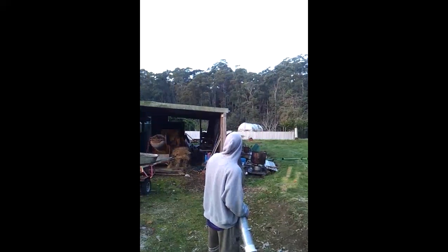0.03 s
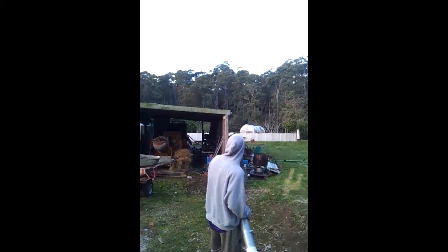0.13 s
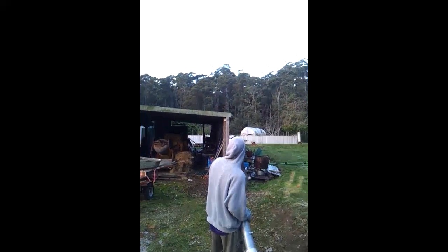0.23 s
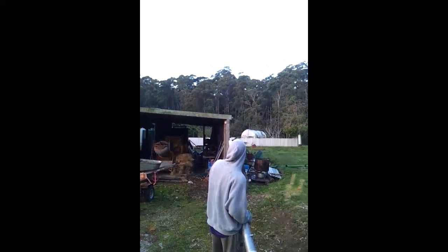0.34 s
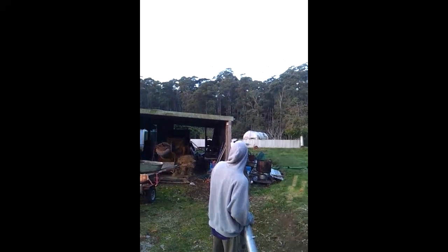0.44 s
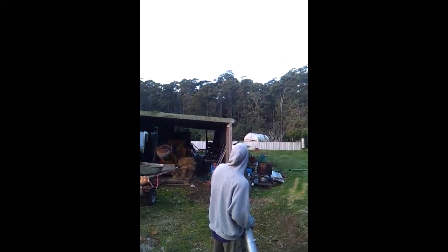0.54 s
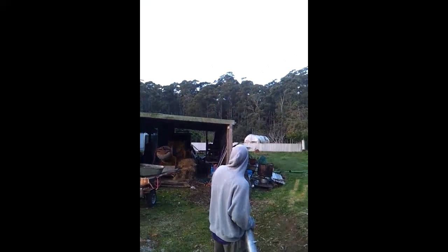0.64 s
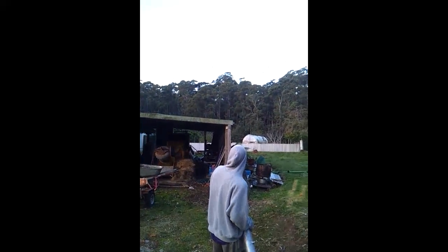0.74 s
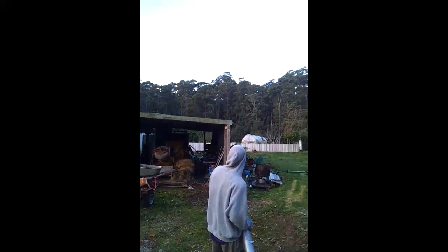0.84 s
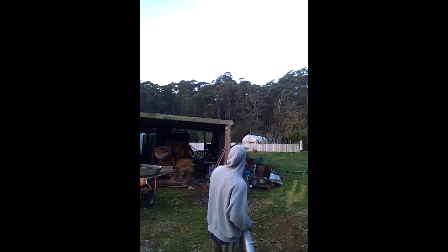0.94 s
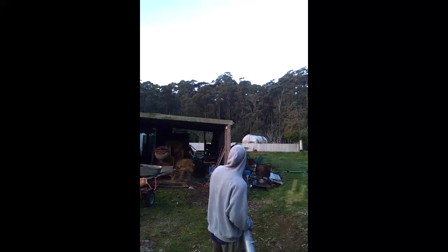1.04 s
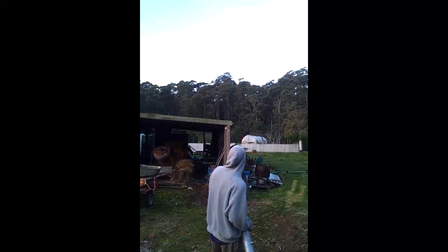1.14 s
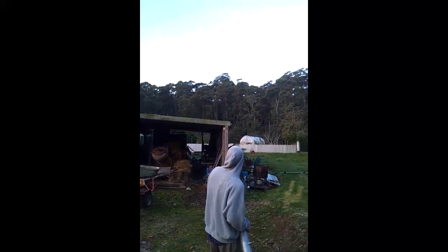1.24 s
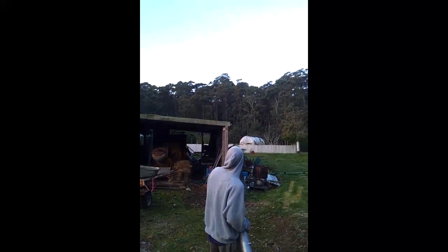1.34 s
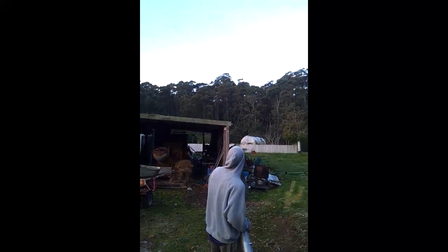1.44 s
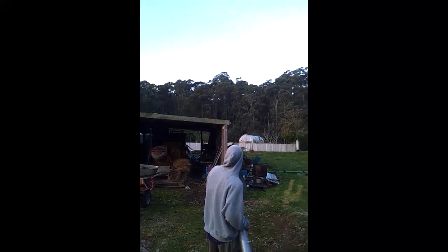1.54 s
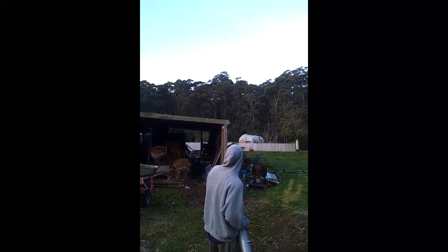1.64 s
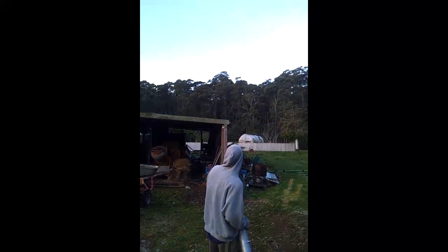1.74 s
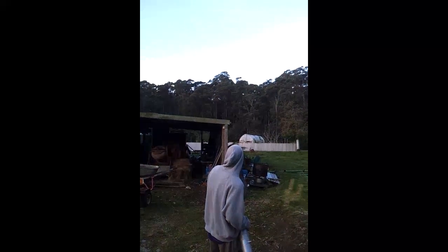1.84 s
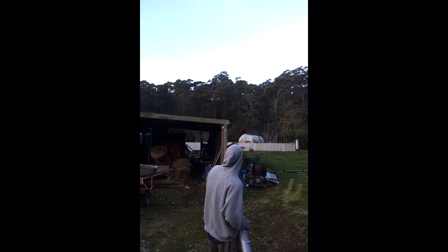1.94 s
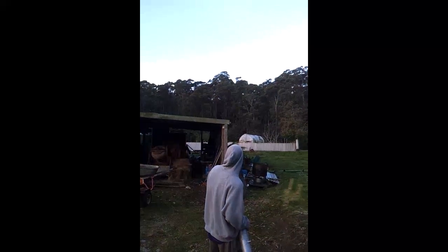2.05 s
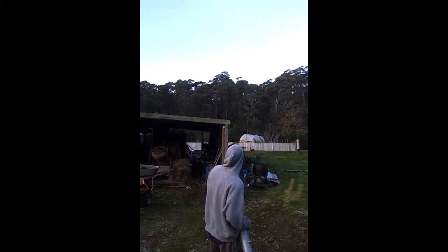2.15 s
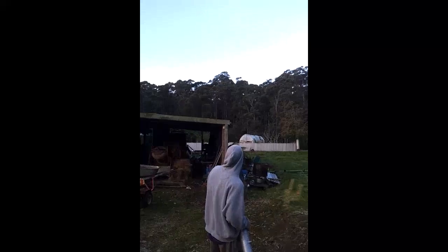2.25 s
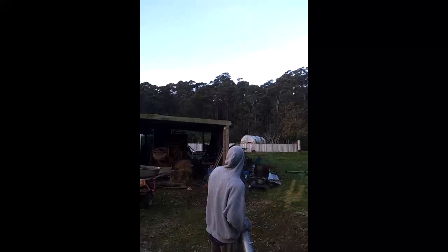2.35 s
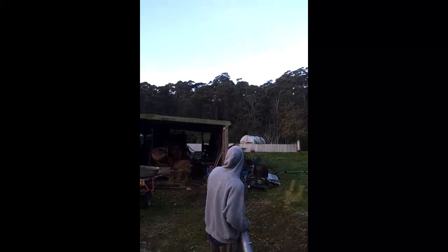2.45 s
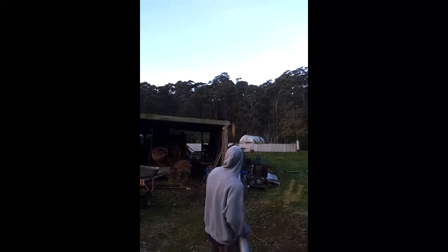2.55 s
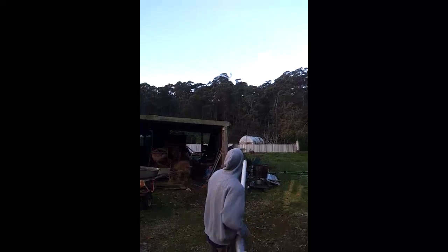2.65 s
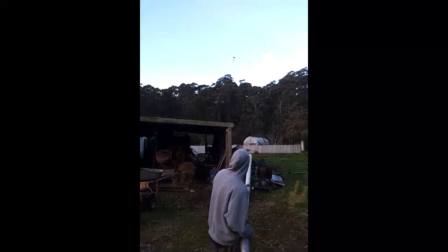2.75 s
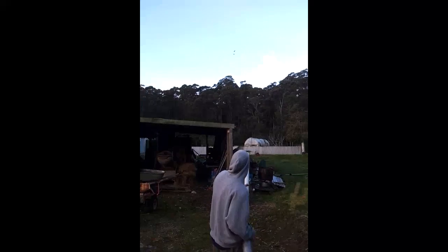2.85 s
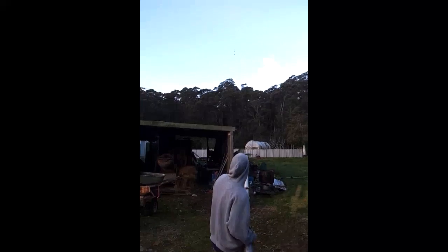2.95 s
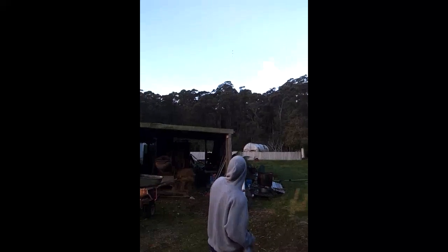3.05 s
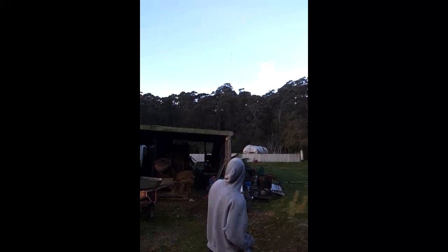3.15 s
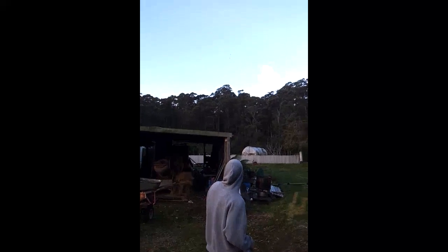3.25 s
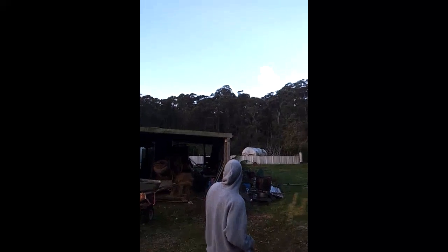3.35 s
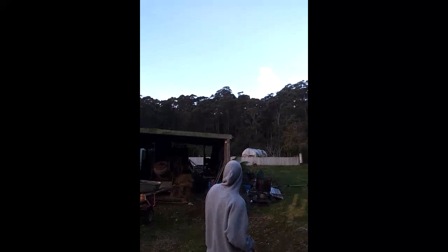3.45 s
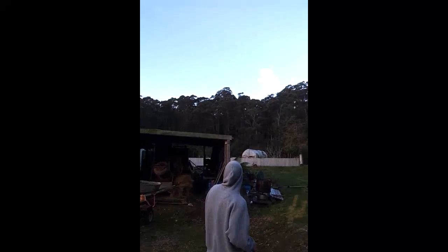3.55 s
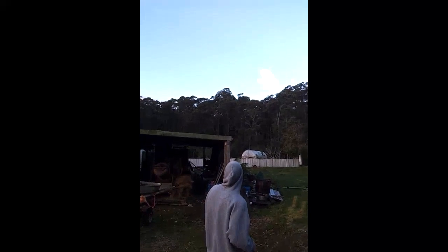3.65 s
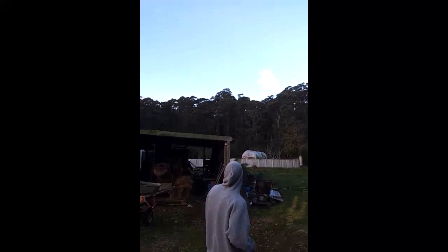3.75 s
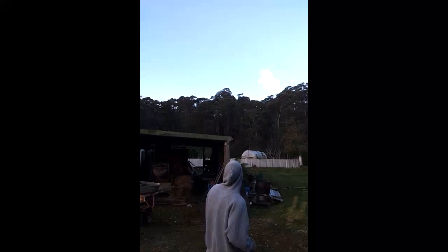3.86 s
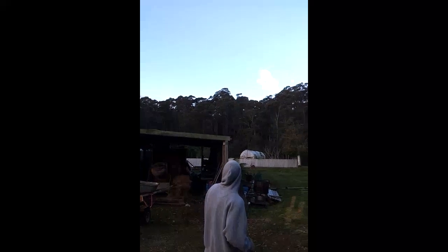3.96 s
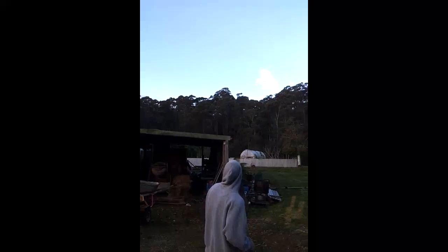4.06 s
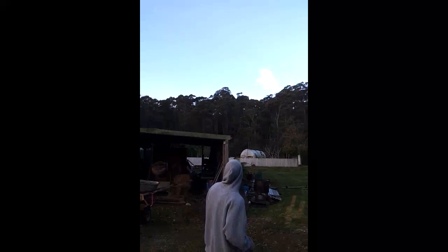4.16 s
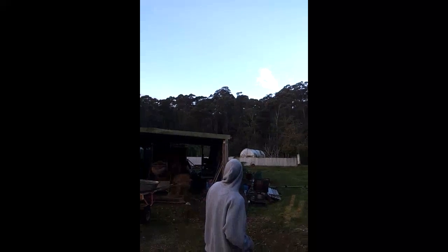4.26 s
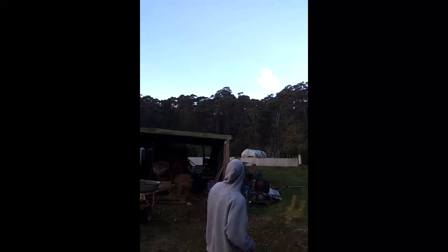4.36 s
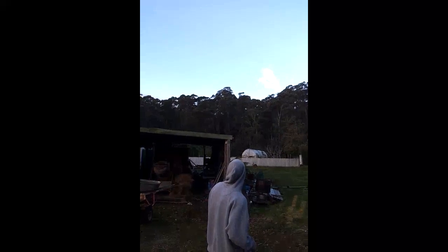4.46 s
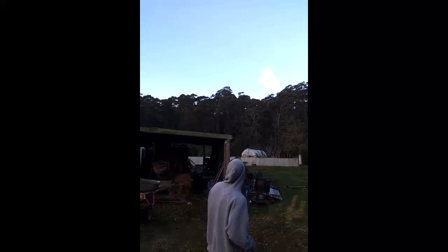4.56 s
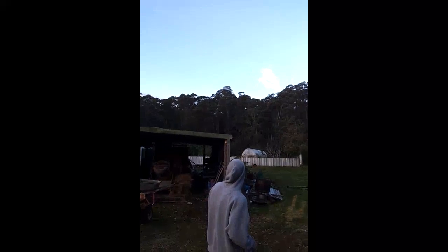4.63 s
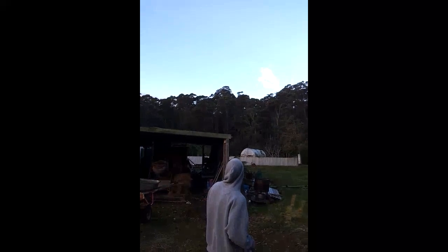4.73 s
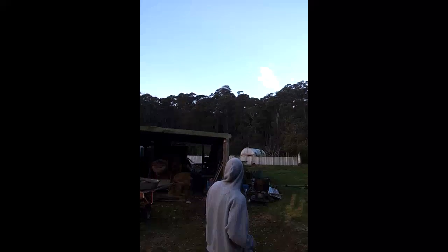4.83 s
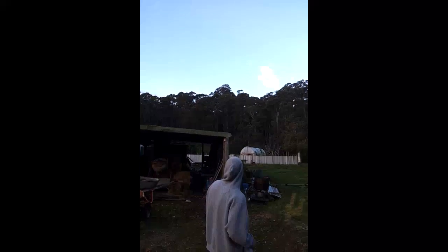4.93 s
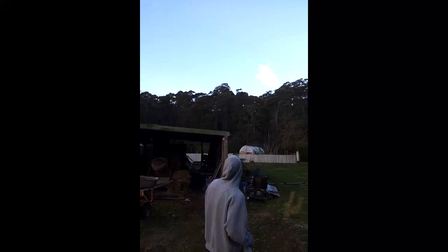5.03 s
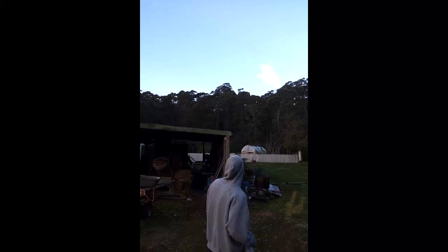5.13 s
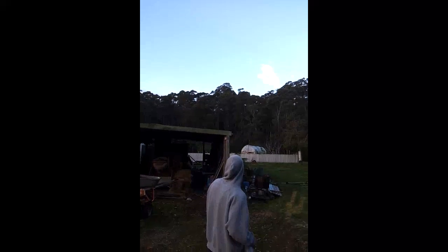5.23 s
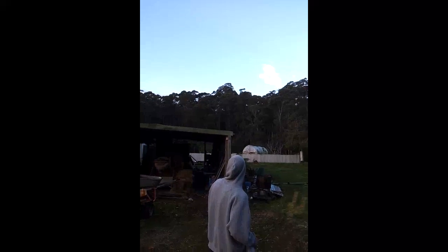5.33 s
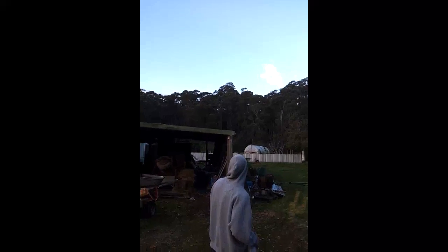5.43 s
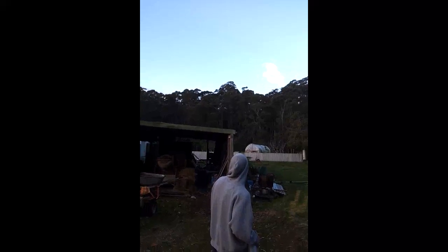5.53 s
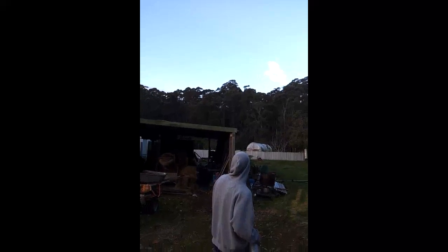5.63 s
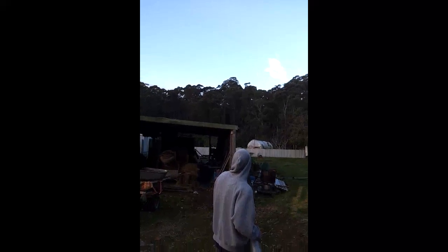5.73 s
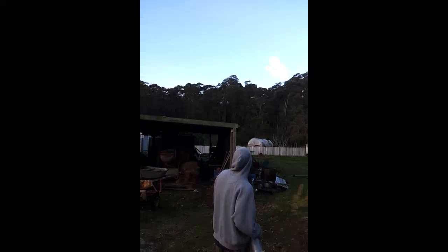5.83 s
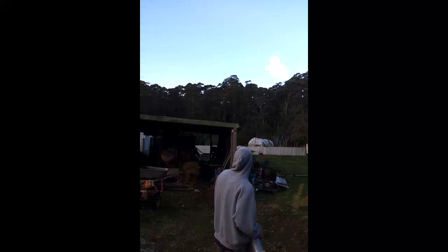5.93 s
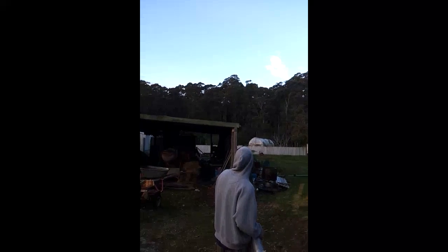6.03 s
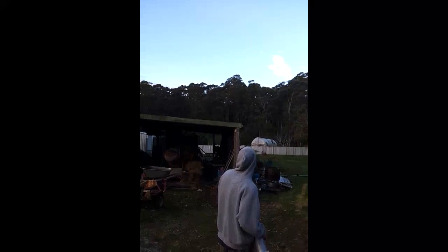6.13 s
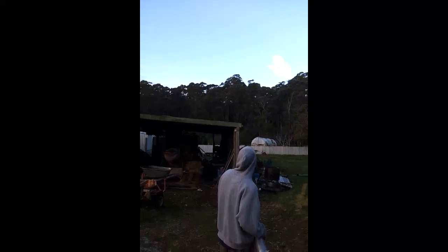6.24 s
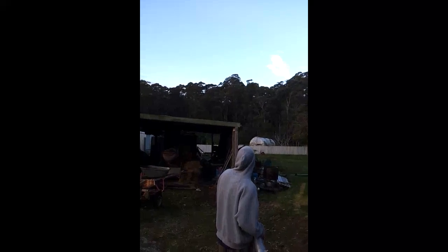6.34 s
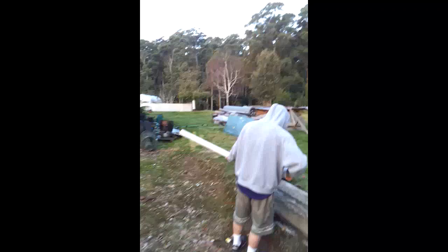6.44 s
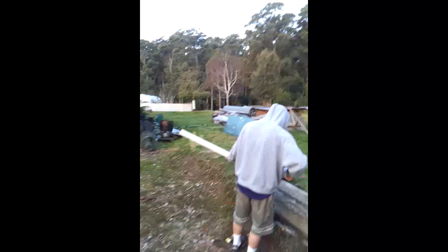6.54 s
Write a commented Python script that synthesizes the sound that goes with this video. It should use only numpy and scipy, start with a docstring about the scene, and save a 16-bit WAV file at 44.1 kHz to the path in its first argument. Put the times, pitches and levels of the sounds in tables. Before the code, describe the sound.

Faint, soft outdoor air runs throughout, with a dull top end. From about 0.2 s, a plastic spud-gun igniter is worked close by: a muted button catch, a hard, rattly hammer snap, then a lighter spring-back click. Snaps fall near 0.26, 0.75, 1.25, 1.69, 2.13 and 2.54 s, each with a brief bright yard reflection. The sixth catches: a small soft pop at 2.56 s and a swiftly swelling gas hiss. At 2.65 s comes a violent bang, crushed by microphone overload, with deep whump, jet roar and hollow barrel resonance, falling away within about half a second. Low rumble continues; slaps from buildings return around 3.1 s and a very faint one near 4 s, over a diffuse forest echo that darkens and fades for seconds. Very faint, high bird peeps occur from 3.7 to 4.9 s, a nearer falling chip with a woodland tail at 5.8 s, and a last peep near 6.2 s.

```python
"""A combustion spud gun in an open yard with a shed, below a wooded hill; still air is heard throughout.
First a piezo igniter is pressed six times: brief contacts excite chamber modes and a spring's rattle.
The last spark catches: a soft pop, then a swelling hiss of gas past the potato, as filtered noise.
The shot follows as shock, blast, jet noise and barrel resonances, and overloads the microphone.
A rumble, forest echoes and slaps from buildings return; then birds call as wavering sine tones."""
import sys
import numpy as np
from scipy import signal
from scipy.fft import rfft, irfft, next_fast_len
from scipy.io import wavfile

SR = 44100
rng = np.random.default_rng(int(sys.argv[2]) if len(sys.argv) > 2 else 0)


def wrap_up_sound(samples):
    """Save the sound to the file named by the first command line argument, as 16-bit audio."""
    columns = np.atleast_2d(samples).T
    # keep every value between -1 and 1, then stretch to whole-number steps
    tamed = np.clip(columns, -1, 1)
    steps = np.round(tamed * 32767).astype(np.int16)
    wavfile.write(sys.argv[1], SR, steps)


N = 290574
TIME = np.arange(N) / SR

# In every colour table below the level is a relative spectral density.
# still outdoor air: (frequency [Hz], level [dB])
AIR_COLOUR = [(15, -34), (25, -8), (145, -4), (180, -6), (340, -5), (554, -7), (924, -9), (1150, -10),
              (1500, -11.5), (5750, -17.5), (6820, -15.5), (8500, -42.5), (11000, -76.5), (18700, -120)]
# the button is pushed in and catches: (time [s], level [dB])
CATCHES = [(0.1843, -19.5), (.6655, -31), (1.1245, -24.5), (1.6016, -18.5), (2.0400, -20.5),
           (2.4572, -22.5)]
# the igniter's hammer strikes: (time [s], level [dB])
SPARKS = [(0.2618, -9), (0.7486, -9), (1.2515, -9.5), (1.6863, -9), (2.1288, -9), (2.5392, -10)]
# the button springs back: (time [s], level [dB])
RELEASES = [(0.5954, -25), (0.9635, -24.5), (1.4634, -24), (1.9138, -24), (2.3557, -24.5)]
# contacts within one hammer strike: (time after the stroke [s], relative level [dB])
HAMMER_CONTACTS = [(-.0024, -13.5), (-.0003, 0.5), (.0034, -6)]
# contacts within one button stroke: (time after the stroke [s], relative level [dB])
BUTTON_CONTACTS = [(0, 1.5), (.0034, -7.5)]
# modes of the plastic chamber and igniter housing:
# (frequency [Hz], level under the hammer [dB], level under the button [dB], t60 [s])
CHAMBER_MODES = [(296, -32, -49, .07), (395, -24, -37, .05), (645, -28.5, -23.5, 0.022),
                 (738, -15.5, -31, 0.043), (873, -16.5, -15, 0.033), (1258, -11.5, -15.5, 0.031),
                 (1453, -19.5, -15.5, 0.023), (1590, -19, -17.5, 0.026), (1910, -24.5, -21.5, 0.022),
                 (2060, -21.5, -23.5, 0.039), (2840, -17.5, -20.5, .02), (4700, -24, -21.5, 0.015),
                 (5300, -19.5, -21, 0.015), (5610, -17, -15, .014), (6090, -16.5, -22, 0.0097),
                 (7000, -20.5, -32.5, 0.011)]
# rattle of the igniter's spring: (frequency [Hz], level [dB])
RATTLE_COLOUR = [(200, -29), (700, -9), (1400, -2.5), (2500, -6), (4000, -5), (5600, -5), (7200, -2.5),
                 (9000, -4)]
# hiss scattered by the clutter round shed and fence: (frequency [Hz], level [dB])
SCATTER_COLOUR = [(200, -14), (800, -5), (2000, -3), (4000, -0.5), (5500, 0), (7200, 1), (9000, -1.0)]
# chamber modes rung as the gas catches: (frequency [Hz], level [dB], t60 [s])
IGNITION_MODES = [(378.6, -40, .06), (820, -27, 0.041), (1270, -34, 0.039)]
# hiss of the leaking gas: (frequency [Hz], level [dB])
LEAK_COLOUR = [(60, -21), (300, -15), (600, -9), (850, 0), (1300, -5.5), (2500, -5), (3600, -4.5),
               (5400, 4.5), (7000, -1), (9000, -8)]
# the blast and two weaker bursts of noise about 0.1 s later: (time [s], level [dB])
BLASTS = [(2.6500, 4.5), (2.748, -24), (2.769, -13)]
# noise of the blast: (frequency [Hz], level [dB])
BLAST_COLOUR = [(60, -19.5), (300, -1), (900, -1), (2200, -2.0), (4000, -14.5), (9000, -29)]
# roar of the jet: (frequency [Hz], level [dB])
ROAR_COLOUR = [(25, -8), (50, 0), (110, -4), (160, -7), (220, -2), (320, 0), (420, -1.5), (520, -6.5),
               (660, -2), (1000, -5.5), (1850, -10), (2500, -7.5), (3600, -10.5), (6300, -7.5),
               (9000, -18.5)]
# modes of the gas sloshing in barrel and chamber: (frequency [Hz], level [dB], t60 [s])
BARREL_MODES = [(46, -16, 0.45), (69, -18.5, 0.56), (110.6, -20, .3), (209.3, 3.5, .2), (290.7, 1, 0.15),
                (335.7, -3, 0.19), (407, -5.5, 0.15), (669, -3.5, 0.34), (948.6, -9, 0.35),
                (1420, -8.5, 0.25)]
# low rumble over the ground: (frequency [Hz], level [dB])
RUMBLE_COLOUR = [(20, -19.5), (60, -8.5), (105, -2.0), (180, -9.5), (500, -40)]
# wooded slopes return the bang: (arrival time [s], rise [s], hold [s], level [dB], t60 [s])
SLOPES = [(2.993, 0.087, 0.12, -38, 1.46), (3.293, 0.083, 0.14, -38, 4.53)]
# echo of the wooded hill before air absorption: (frequency [Hz], level [dB])
FOREST_COLOUR = [(25, -13), (95, -6), (170, -15), (370, -5), (480, -9), (660, 2), (820, -4), (1100, -3),
                 (1550, -9), (2600, -10), (4000, -11.5), (5500, -11.5), (7000, -14.5), (8500, -26)]
# slaps from far buildings: (time [s], level [dB])
SLAPS = [(3.0770, -24), (3.1168, -25), (3.1330, -30), (3.159, -32), (3.980, -45)]
# noise of the slaps: (frequency [Hz], level [dB])
SLAP_COLOUR = [(200, -37), (500, 0), (700, 5.5), (1200, -9), (3000, -14.0), (8000, -20)]
# thin calls of far birds: (time of the middle [s], frequency [Hz], length [s], level [dB])
PEEPS = [(3.737, 6100, .06, -64), (3.998, 6280, .12, -68), (4.09, 7100, .12, -67), (4.266, 5650, .14, -66),
         (4.33, 7150, 0.19, -67.5), (4.616, 7260, 0.24, -66), (4.825, 6040, 0.057, -63),
         (4.944, 7300, 0.21, -70), (6.177, 6660, 0.12, -68)]
# the nearer bird's echo among the trees: (frequency [Hz], level [dB])
CHIP_ECHO_COLOUR = [(1500, -17.5), (2200, -5), (2520, -3.0), (2900, -12)]

# the air starts at half strength and swells to a steady level
AIR_DB, AIR_RISE_S = -57.5, 0.075
# the spring ticks faintly as it is cocked, just before every strike
COCK_LEAD_S, COCK_DB = 0.04, -41
# brightness of each kind of stroke: tilt of the modes in dB at 5 kHz, and gain of the rattle
CATCH_TREBLE_DB, COCK_TREBLE_DB, SPARK_TREBLE_DB, RELEASE_TREBLE_DB = -9, -6, 0.35, -1.3
# echo delays of the igniter's sound
SHED_S, FENCE_S = .029, .126
# the mixture catches; the potato leaves the muzzle
IGNITION_S, SHOT_S = 2.5638, 2.650
# the leak grows as a power of the burning time and dies away once the barrel is open
LEAK_DB, LEAK_POWER, LEAK_T60_S = -13, 1.45, .045
# a last spurt escapes as the potato nears the muzzle
SPURT_LEAD_S, SPURT_RISE_S, SPURT_DB = .012, .005, -16
# the jet roars at full strength, then dies away; its scatter in the yard lasts longer
ROAR_DB, ROAR_HOLD_S, ROAR_T60_S = -1.7, .052, .39
YARD_DB, YARD_T60_S = -17.5, 0.87
# the barrel's quarter-wave note
BARREL_NOTE_HZ = 128
# the gas ball at the muzzle overshoots and falls back
PUFF_LAG_S, PUFF_DB, PUFF_HZ, PUFF_T60_S = .014, 2, 100, .03
# the rumble after the shot
RUMBLE_DB, RUMBLE_RISE_S, RUMBLE_T60_S = -40.5, 0.22, 1.48
# the nearer bird's chip lifts slightly to its top pitch, then slurs down and fades
CHIP_S, CHIP_RISE_S, CHIP_HOLD_S, CHIP_T60_S = 5.768, .026, 0.012, 0.081
CHIP_TOP_HZ, CHIP_UP_OCT_PER_S, CHIP_DOWN_OCT_PER_S, CHIP_DB = 2600, 4, 27.3, -54
# upper edge of the recorder's final filter
CUTOFF_HZ = 15752


def from_db(db):
    """Logarithmic level: decibels become an amplitude ratio."""
    return 10 ** (np.asarray(db) / 20)


def cut(x, hz, kind, order=2):
    """Maximally flat (Butterworth) filtering."""
    return signal.sosfilt(signal.butter(order, hz, kind, fs=SR, output="sos"), x + 1e-18)


def zero_phase_low(x, hz, order):
    """Zero-phase low-pass filtering: forward and backward passes cancel the delay."""
    return signal.sosfiltfilt(signal.butter(order, hz, fs=SR, output="sos"), x)


def noise(colour):
    """Spectral shaping: white noise weighted over log frequency, scaled to rms 1."""
    size = next_fast_len(N)
    hz, db = np.transpose(colour)
    bins = np.maximum(np.fft.rfftfreq(size, 1 / SR), 1)
    gain = from_db(np.interp(np.log(bins), np.log(hz), db))
    x = irfft(rfft(rng.standard_normal(size)) * gain, size)[:N]
    return x / np.std(x)


def fade(start, t60):
    """Exponential decay: zero until the start, then falling from 1 by 60 dB in t60."""
    return (TIME >= start) * from_db(-60 * np.clip((TIME - start) / t60, 0, 4))


def swell(start, rise_s, hold_s, t60):
    """Build-up and decay: a straight rise to 1, a hold, an exponential decay."""
    age = TIME - start
    return np.clip(age / rise_s, 0, 1) * from_db(-60 * np.clip((age - rise_s - hold_s) / t60, 0, 4))


def flutter(rate_hz, depth_db):
    """Random amplitude modulation: a gain wandering about 1 by depth_db rms."""
    slow = cut(rng.standard_normal(N), rate_hz, "low")
    return from_db(depth_db * slow / np.std(slow))


def taps(times, sizes):
    """Impulsive excitation: single samples at the given times."""
    out = np.zeros(N)
    np.add.at(out, np.round(np.asarray(times) * SR).astype(int), sizes)
    return out


def ring(force, hz, t60):
    """Damped resonance: a unit impulse sets a sine of height 1 ringing."""
    radius = from_db(-60 / (t60 * SR))
    angle = 2 * np.pi * hz / SR
    return signal.lfilter([0, np.sin(angle)], [1, -2 * radius * np.cos(angle), radius ** 2], force + 1e-18)


def linger(force, t60):
    """First-order relaxation: each impulse becomes an exponential decay."""
    return signal.lfilter([1], [1, -from_db(-60 / (t60 * SR))], force + 1e-18)


def open_air():
    """Stationary background noise: coloured noise settling exponentially to its level."""
    return from_db(AIR_DB) * (1 - np.exp(-TIME / AIR_RISE_S) / 2) * noise(AIR_COLOUR)


def clicks(strokes, contacts, mode_dbs, rattle_db, rattle_t60, rattle_edge_hz, low_hz, vary_db, light_db=7):
    """Modal excitation by impact: quick contacts ring the chamber and rattle the spring."""
    stroke_s, stroke_db, treble_db = np.transpose(strokes)
    lag, contact_db = np.transpose(contacts)
    times = (stroke_s[:, None] + lag).ravel()
    level = (stroke_db[:, None] + contact_db).ravel()
    bright = np.repeat(treble_db, len(lag))
    glancing = np.tile(contact_db < contact_db.max(), len(stroke_s))
    rattle_force = taps(times, from_db(level + bright + rattle_db))
    out = cut(noise(RATTLE_COLOUR), rattle_edge_hz, "low") * linger(rattle_force, rattle_t60)
    for k, ((hz, _, _, t60), mode_db) in enumerate(zip(CHAMBER_MODES, mode_dbs)):
        strength = level + mode_db + bright * hz / 5000
        strength += vary_db * rng.standard_normal(len(times))
        # light contacts barely move the slow modes
        strength -= glancing * light_db * max(0, np.log2(2500 / hz))
        polarity = (-1) ** (k // 2)
        out += polarity * ring(taps(times, from_db(strength)), hz, t60)
    return cut(out, low_hz, "high")


def yard(x, scatter_db, t60, build_s, shed_db, fence_db):
    """Reflection and scattering: shed and fence answer once each, clutter adds a soft, bright hiss."""
    spread = fade(0, t60) ** 2 * (1 - np.exp(-(TIME / build_s) ** 4))
    energy = np.maximum(signal.fftconvolve(x ** 2, spread / spread.sum())[:N], 0)
    scatter = noise(SCATTER_COLOUR) * np.sqrt(energy)
    shed = cut(taps([SHED_S], from_db(shed_db)), 5400, "high")
    fence = cut(taps([FENCE_S], from_db(fence_db)), 1200, "high")
    return x + from_db(scatter_db) * scatter + signal.fftconvolve(x, shed + fence)[:N]


def igniter():
    """Impact radiation outdoors: catch, faint tick, hammer strike and button return, heard in the yard."""
    _, hammer_dbs, button_dbs, _ = np.transpose(CHAMBER_MODES)
    strikes = [(s, db, SPARK_TREBLE_DB) for s, db in SPARKS]
    touches = [(s, db, CATCH_TREBLE_DB) for s, db in CATCHES]
    touches += [(s - COCK_LEAD_S, COCK_DB, COCK_TREBLE_DB) for s, _ in SPARKS]
    touches += [(s, db, RELEASE_TREBLE_DB) for s, db in RELEASES]
    hammer = clicks(strikes, HAMMER_CONTACTS, hammer_dbs, rattle_db=-10.5, rattle_t60=0.029,
                    rattle_edge_hz=9200, low_hz=240.2, vary_db=1.56)
    button = clicks(touches, BUTTON_CONTACTS, button_dbs, rattle_db=-2.5, rattle_t60=0.024,
                    rattle_edge_hz=3700, low_hz=550, vary_db=2.0)
    return yard(hammer + button, scatter_db=-11.5, t60=0.37, build_s=.024, shed_db=-13.5, fence_db=-29)


def offset_bump(level_db, hz, t60):
    """Damped resonance: a slow, uneven electrical offset bump, below 40 Hz, follows each spark."""
    s, db = np.transpose(SPARKS)
    return ring(taps(s, from_db(db + level_db)), hz, t60) * flutter(rate_hz=30, depth_db=2.5)


def ignition_pop(push_t60, pop_db):
    """Pressure-step excitation: the catching mixture pushes the chamber modes into a soft pop."""
    push = linger(taps([IGNITION_S], 0.91), push_t60)
    pop = sum(from_db(db) * ring(push, hz, t60) for hz, db, t60 in IGNITION_MODES)
    return from_db(pop_db) * cut(pop / np.sqrt(push.sum()), [620, 1300], "band")


def gas_leak(burn_db):
    """Turbulent leakage: rising pressure drives the hiss past the potato and the chamber's hum."""
    burnt = np.clip((TIME - IGNITION_S) / (SHOT_S - IGNITION_S), 0, 1)
    release = np.where(TIME < SHOT_S, 1, fade(SHOT_S, LEAK_T60_S))
    pressure = from_db(LEAK_DB) * burnt ** LEAK_POWER * release
    spurt = swell(SHOT_S - SPURT_LEAD_S, SPURT_RISE_S, SPURT_LEAD_S - SPURT_RISE_S, LEAK_T60_S)
    pressure += from_db(SPURT_DB) * spurt
    hum = cut(rng.standard_normal(N), [760, 920], "band")
    return pressure * (noise(LEAK_COLOUR) + from_db(burn_db) * hum)


def shock_wave(shock_db, shock_s):
    """Blast-wave law: a sudden jump, a near-linear fall through zero, an exponential tail."""
    age = np.maximum(TIME - SHOT_S, 0) / shock_s
    return -from_db(shock_db) * (TIME >= SHOT_S) * (1 - age) * np.exp(-np.minimum(age, 50))


def blast(t60):
    """Impulsive gas release: a decaying noise burst, with two weaker bursts about 0.1 s later."""
    s, db = np.transpose(BLASTS)
    return noise(BLAST_COLOUR) * linger(taps(s, from_db(db)), t60)


def hollow(x, depth_db, below_hz):
    """Quarter-wave comb: the inverted muzzle return favours odd multiples of the barrel's note."""
    round_trip = round(SR / (2 * BARREL_NOTE_HZ))   # samples
    low = zero_phase_low(x, below_hz, order=2)
    returned = from_db(depth_db) * np.pad(low, (round_trip, 0))[:N]
    return x - low + (low - returned) / np.hypot(1, from_db(depth_db))


def jet_roar(rise_s):
    """Jet noise: unsteady turbulence with the barrel's hollow colour, outlasted by yard scatter."""
    jet = from_db(ROAR_DB) * swell(SHOT_S, rise_s, ROAR_HOLD_S, ROAR_T60_S)
    scatter = from_db(YARD_DB) * fade(SHOT_S, YARD_T60_S)
    envelope = np.hypot(jet, scatter)   # independent noises add in power
    turbulence = hollow(noise(ROAR_COLOUR), depth_db=-14, below_hz=3500)
    return envelope * turbulence * flutter(rate_hz=51, depth_db=1.0)


def barrel_slosh(lag_s):
    """Air-column resonance: the gas swings in barrel and chamber at damped modes of alternating sign."""
    swing = taps([SHOT_S + lag_s], 1)
    return sum((-1) ** k * from_db(db) * ring(swing, hz, t60)
               for k, (hz, db, t60) in enumerate(BARREL_MODES))


def muzzle_puff():
    """Gas-ball oscillation: the overshooting ball falls back with a deep, heavily damped whump."""
    return -ring(taps([SHOT_S + PUFF_LAG_S], from_db(PUFF_DB)), PUFF_HZ, PUFF_T60_S)


def shot(shock_db, shock_s, blast_t60, slosh_s):
    """Superposition: shock, blast, jet, swinging gas column and gas ball add as the potato leaves."""
    bang = shock_wave(shock_db, shock_s) + blast(blast_t60) + jet_roar(shock_s)
    return bang + barrel_slosh(slosh_s) + muzzle_puff()


def ground_rumble():
    """Low-frequency propagation: a slow swell of deep noise rolls out over the ground."""
    return from_db(RUMBLE_DB) * swell(SHOT_S, RUMBLE_RISE_S, 0, RUMBLE_T60_S) * noise(RUMBLE_COLOUR)


def forest_echo(loss_db_per_khz_s):
    """Diffuse scattering with air absorption: the longer the path, the more treble the air takes."""
    rest = hollow(noise(FOREST_COLOUR), depth_db=-10.5, below_hz=3200)
    trees = 0
    path_s = np.maximum(TIME - SLAPS[0][0], 0)
    # peel off half-octave bands from below, each fading in proportion to its frequency
    for hz in 500 * np.sqrt(2) ** np.arange(10):
        band = zero_phase_low(rest, hz, order=4)
        rest = rest - band
        trees = trees + band * from_db(-loss_db_per_khz_s * path_s * hz / 1e3)
    clumps = flutter(rate_hz=34, depth_db=1.0)   # the trees stand unevenly
    power = sum((from_db(db) * swell(s, rise, hold, t60)) ** 2 for s, rise, hold, db, t60 in SLOPES)
    return trees * clumps * np.sqrt(power)


def building_slaps(t60):
    """Discrete reflection: far buildings return short bursts that keep the barrel's hollow note."""
    s, db = np.transpose(SLAPS)
    bursts = noise(SLAP_COLOUR) * linger(taps(s, from_db(db)), t60)
    note = ring(taps(s, from_db(db - 5.0)), hz=672, t60=0.035)
    return from_db(-4.5) * bursts + note


def whistle(hz, waver):
    """Frequency modulation: a near-pure tone of rms 1, slightly unsteady in pitch."""
    wobble = cut(rng.standard_normal(N), 153, "low")
    unsteady_hz = hz * (1 + waver * wobble / np.std(wobble))
    return np.sqrt(2) * np.sin(2 * np.pi * np.cumsum(unsteady_hz) / SR)


def far_peeps():
    """Windowed tones: thin peeps swell and fade as half a cosine."""
    out = np.zeros(N)
    for middle_s, hz, length, db in PEEPS:
        window = np.cos(np.pi * np.clip((TIME - middle_s) / length, -.5, .5))
        out += whistle(hz, waver=.016) * from_db(db) * window
    return out


def near_chip(echo_db=-9, echo_t60=2.0):
    """Pitch glide and reverberation: a falling chip lingers among the trees."""
    past_top = TIME - CHIP_S - CHIP_RISE_S
    octaves = np.minimum(CHIP_UP_OCT_PER_S * past_top, -CHIP_DOWN_OCT_PER_S * past_top)
    tone = whistle(CHIP_TOP_HZ * 2 ** octaves, waver=0.0316)
    chip = tone * from_db(CHIP_DB) * swell(CHIP_S, CHIP_RISE_S, CHIP_HOLD_S, CHIP_T60_S)
    trees = noise(CHIP_ECHO_COLOUR) * fade(SHED_S, echo_t60)
    return chip + from_db(echo_db) * signal.fftconvolve(chip, trees / np.linalg.norm(trees))[:N]


def scene():
    """Linear superposition of air, igniter, shot, echoes and birds."""
    presses = igniter() + offset_bump(level_db=-33, hz=17, t60=0.19)
    burning = ignition_pop(push_t60=.0006, pop_db=3.0) + gas_leak(burn_db=4)
    bang = shot(shock_db=7.5, shock_s=0.00032, blast_t60=0.13, slosh_s=.008)
    echoes = ground_rumble() + forest_echo(loss_db_per_khz_s=5.0) + building_slaps(t60=0.047)
    birds = far_peeps() + near_chip()
    return (open_air() + presses + burning + bang + echoes + birds)[None]


def record(dry, top=0.62):
    """Saturation and band limiting: the microphone overloads, the recorder narrows and flattens peaks."""
    overloaded = top * dry / (top ** 4 + dry ** 4) ** (1 / 4)
    narrow = cut(cut(overloaded, 7230, "low", order=12), 8800, "low", order=8)
    excess = narrow - np.clip(narrow, -.69, .69)
    soft_excess = zero_phase_low(excess, 8000, order=4)
    flattened = narrow - (excess + soft_excess) / 2
    return cut(flattened, CUTOFF_HZ, "low", order=24)


dry = scene()
out = record(dry)
wrap_up_sound(out)
```